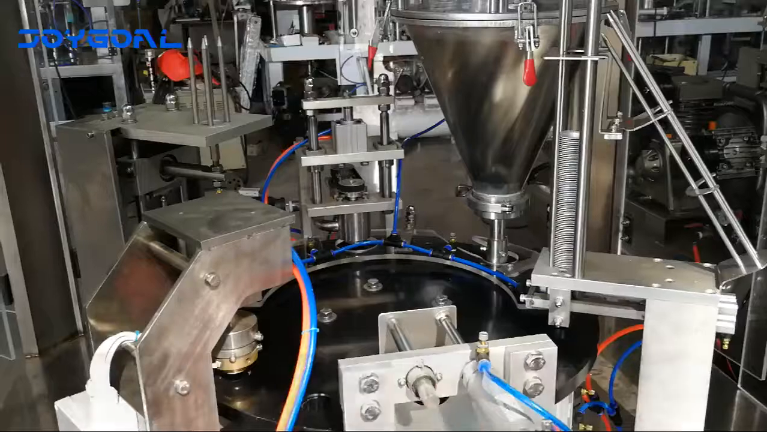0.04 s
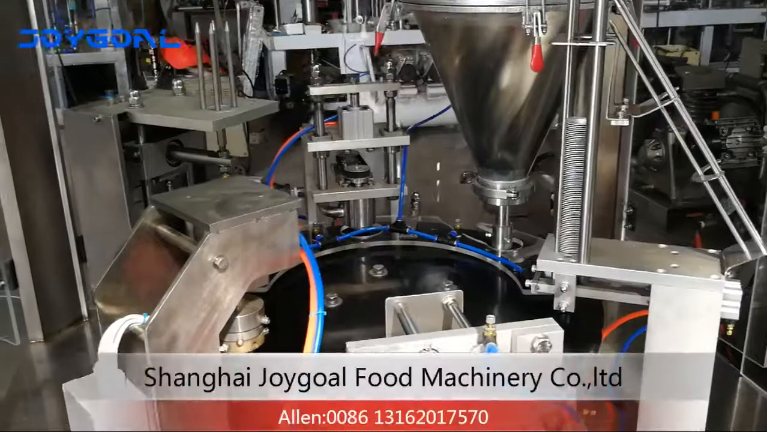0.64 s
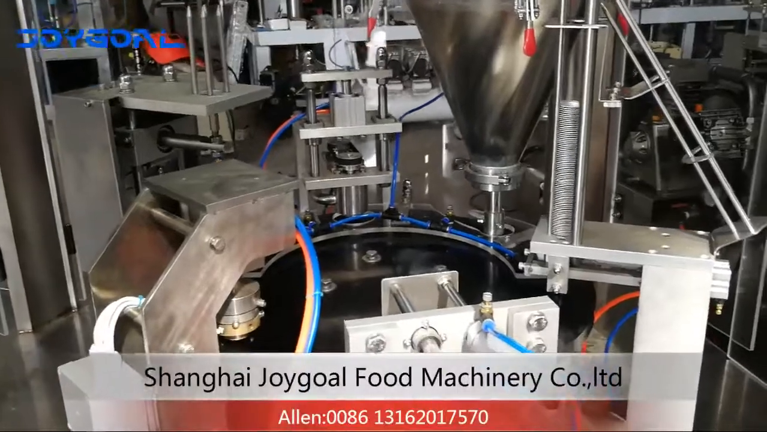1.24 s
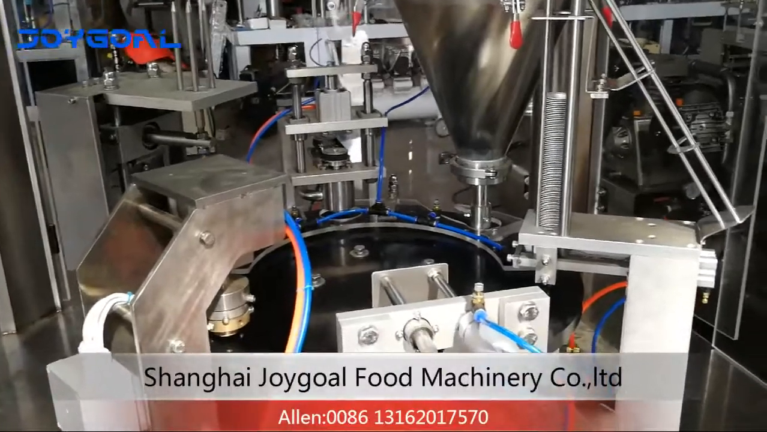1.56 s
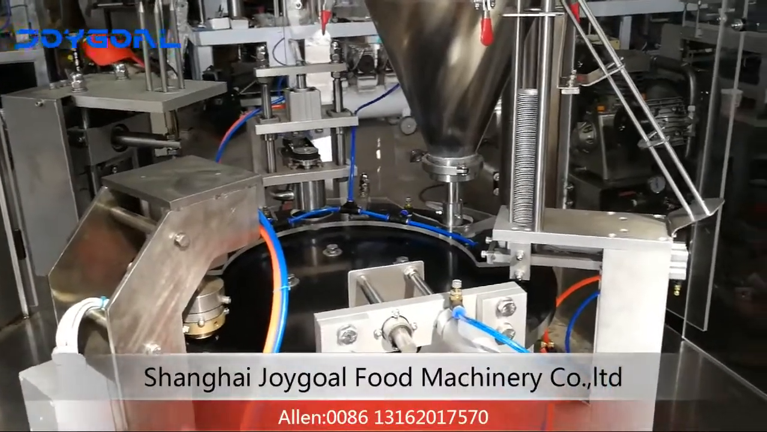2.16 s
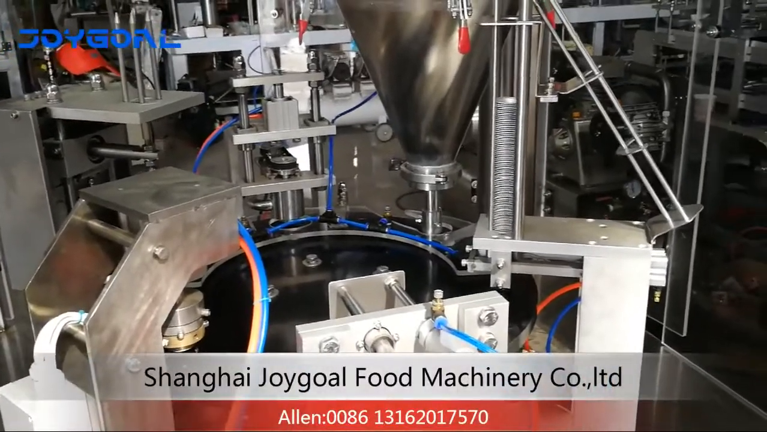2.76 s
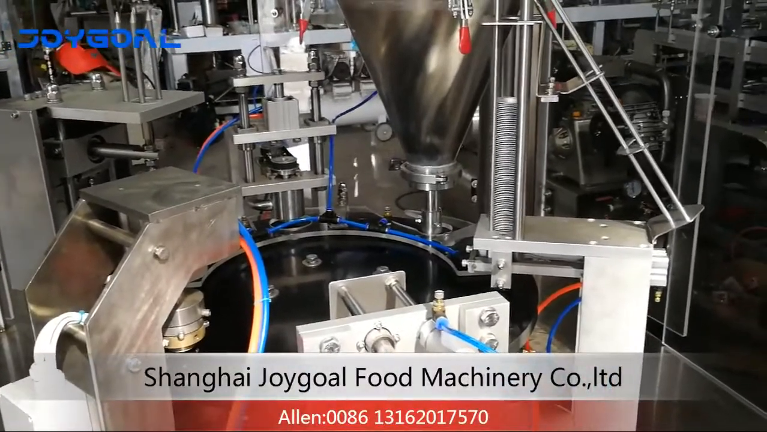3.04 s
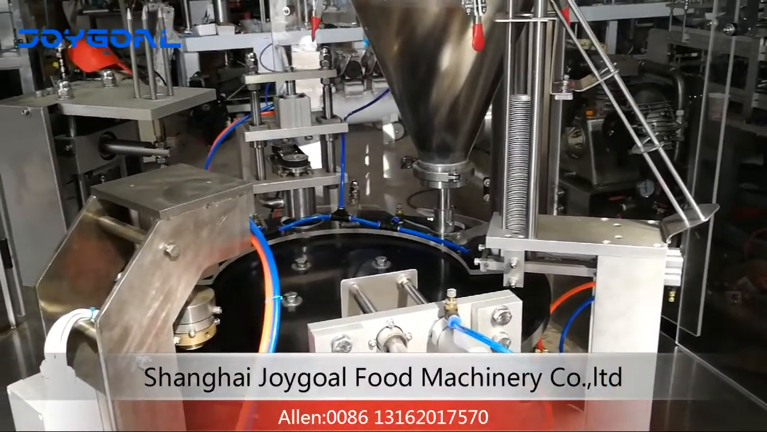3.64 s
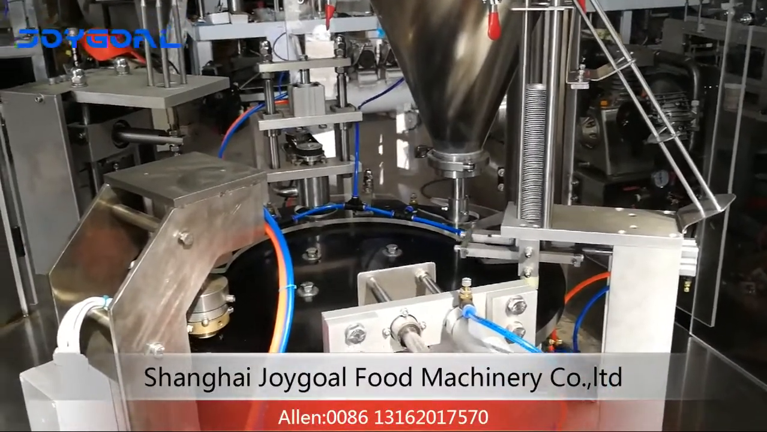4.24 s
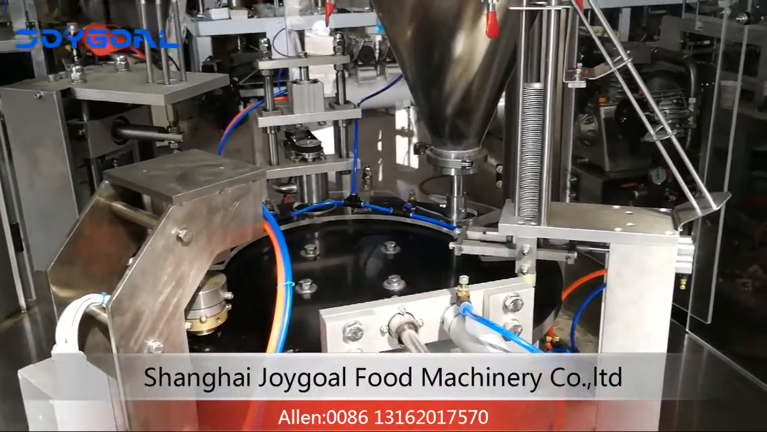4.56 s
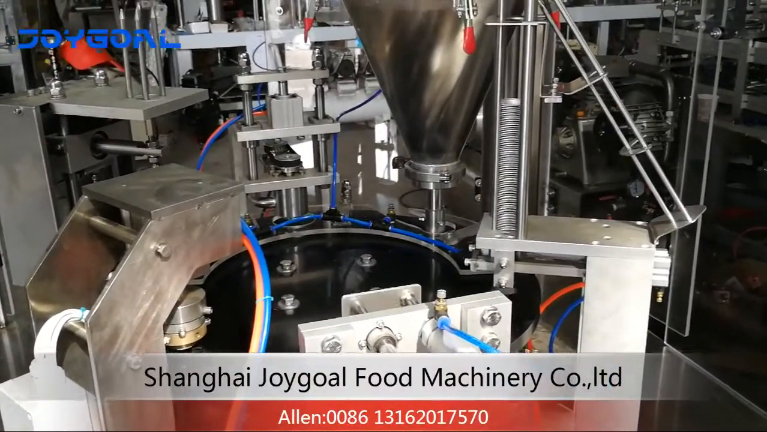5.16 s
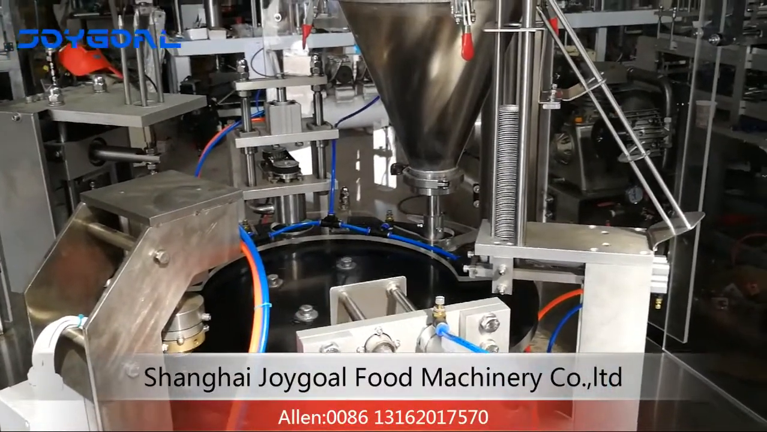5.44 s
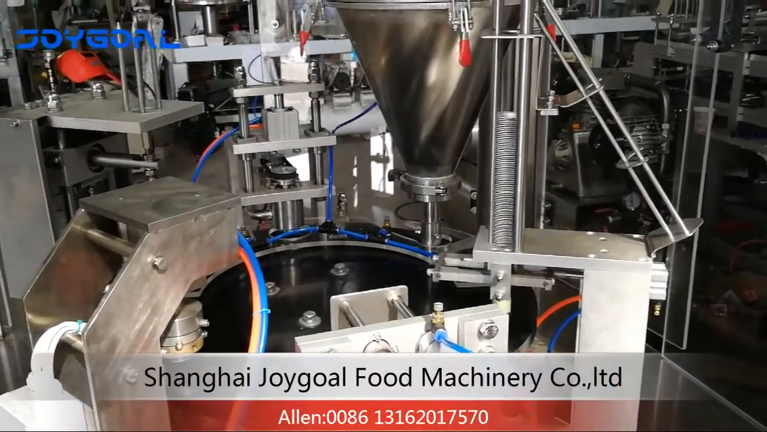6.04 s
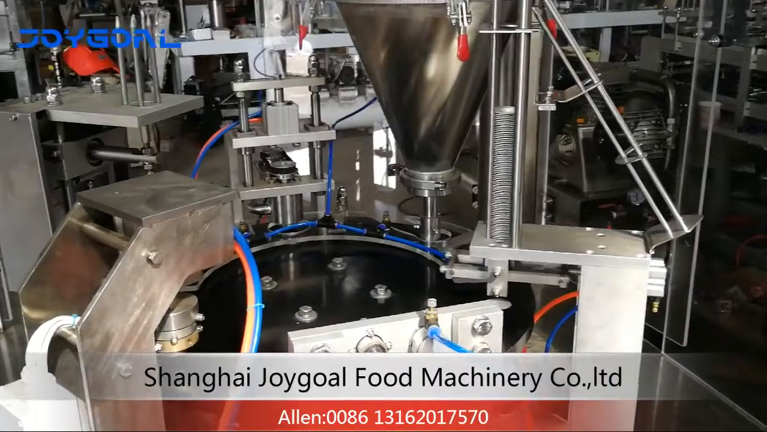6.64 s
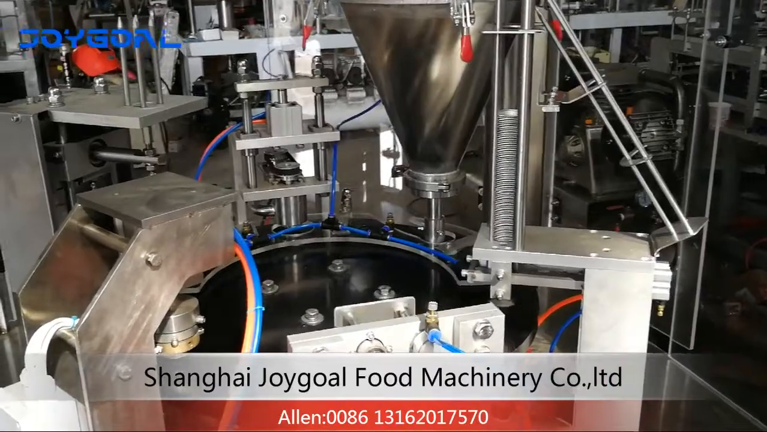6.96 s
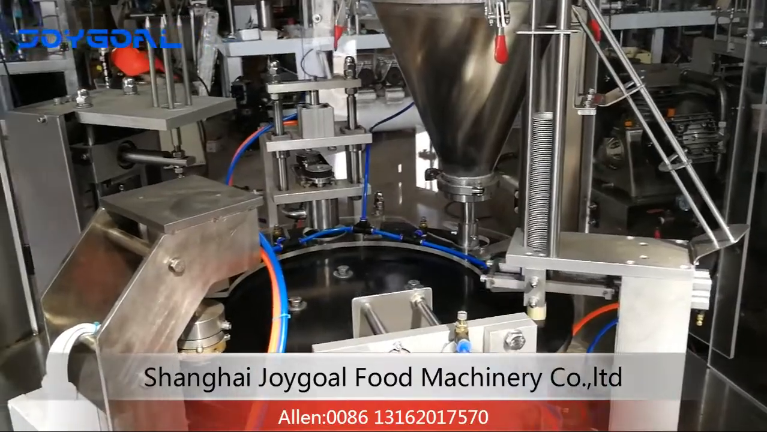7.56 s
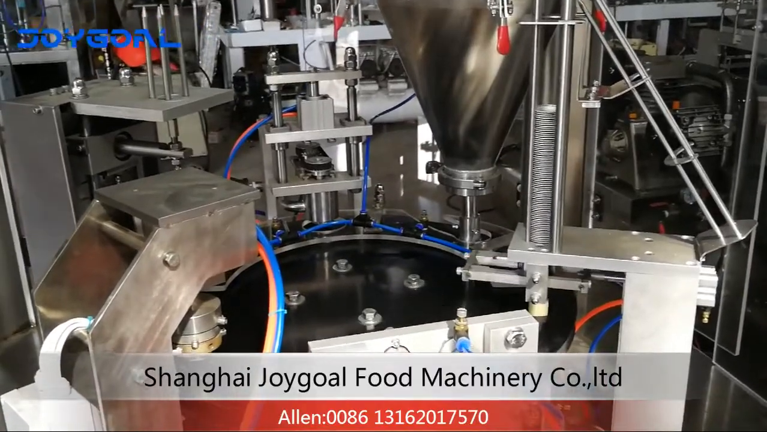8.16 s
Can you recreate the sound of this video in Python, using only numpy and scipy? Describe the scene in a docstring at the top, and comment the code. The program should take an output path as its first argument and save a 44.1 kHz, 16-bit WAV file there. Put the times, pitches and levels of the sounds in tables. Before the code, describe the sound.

Steady pump hum and throbbing whine with air leaks and thin whistles, joined midway by rhythmic air puffs, low thumps and light metallic clacks.

```python
"""A vacuum pump drones and whines close by: a rotary filling and sealing machine runs in a workshop.
The pump's tones follow its turning shaft, while compressed air hisses, leaks and whistles in the fittings.
From about 3.9 s the stations work: every 1.8 s four air valves puff in turn, each with a low thump,
cylinders knock against their metal stops, and loose parts rattle. The hard walls add a short echo."""
import sys
import numpy as np
from scipy import signal
from scipy.fft import rfft, irfft, next_fast_len
from scipy.io import wavfile

SR = 44100
rng = np.random.default_rng(int(sys.argv[2]) if len(sys.argv) > 2 else 0)


def generate_wav(signal):
    """Clip the signal to [-1, 1] and save it as 16-bit WAV at the path in sys.argv[1]."""
    frames = np.transpose(np.atleast_2d(signal))
    scaled = np.clip(frames, -1, 1) * 32767
    pcm = np.round(scaled).astype(np.int16)
    wavfile.write(sys.argv[1], SR, pcm)


N = 365588
TIME = np.arange(N) / SR
FIRST_CYCLE_S, CYCLE_S, CYCLE_COUNT = 3.893, 1.7985, 3
CYCLE_STARTS_S = FIRST_CYCLE_S + CYCLE_S * np.arange(CYCLE_COUNT)

# How fast the pump's shaft turns: time_s, turns_per_s
SHAFT_SPEED = [(0.5, 15.536), (8.3, 15.519)]
# Tones of the drone (left_db above 0 means louder on the left): waves_per_turn, level_db, left_db
DRONE_TONES = [(3, -62, 0), (4, -53, -1), (5, -49, -7), (6, -56.5, -1), (7, -62, 1), (8, -53, 0),
               (9, -45.5, 9.5), (10, -51.5, -15), (11, -38.7, 0), (15, -43, 1), (16, -51.5, 4),
               (18, -54, -16), (20, -45, 1.5), (23, -52, 11), (24, -47, -6.5), (30, -48, 6.5),
               (33, -47.5, -5), (40, -43.5, 5.5), (41, -59, 16), (46, -48, 9.5), (49, -47, 10),
               (52, -53, 24), (53, -55, 19.5), (56, -53, 19.5)]
# Weaker tones around the main whine: waves_per_turn, level_db, left_db
WHINE_TONES = [(74, -47, -6), (75, -41, 3), (76, -44, 10), (77, -40.5, 3), (81, -50, -3), (82, -47, 5)]
WHINE_WAVES_PER_TURN = 79
# The four valves of a cycle: offset_s, level_db, pitch_hz, width_hz, decay_s, thump_db
VALVE_PUFFS = [(0, -26.5, 7730, 1200, 0.031, -29), (.341, -30, 5300, 1450, .039, -54),
               (.746, -27.5, 7420, 1270, .037, -31.5), (1.144, -30.5, 4970, 1250, 0.032, -55)]
# How alike the two sides are in spread-out noise: pitch_hz, likeness (1 = the same)
SIDE_LIKENESS = [(90, .997), (200, .95), (400, .5), (700, 0), (1300, .15), (3000, 0)]
# Which side that noise favours: pitch_hz, left_db
SIDE_BALANCE = [(100, -1.5), (350, 7), (700, 2.5), (1300, 5.5), (2400, -0.5), (4400, -2.5), (8000, -2.5),
                (10500, 9), (13000, 19), (15500, 17.5)]


def amp(db):
    """Turns decibels into a gain to multiply by."""
    return 10 ** (np.asarray(db) / 20)


def unit(x):
    """Scales a signal to an average (rms) strength of 1."""
    return x / np.sqrt(np.mean(x ** 2) + 1e-20)


def follow(rows):
    """Joins (time_s, value) points into a curve over the whole scene."""
    return np.interp(TIME, *np.transpose(rows))


def at_hz(rows, hz):
    """Reads between (pitch_hz, value) points, spaced by octaves."""
    pitches, values = np.transpose(rows)
    return np.interp(np.log(hz + 1), np.log(pitches + 1), values)


def pan(left_db):
    """Two gains that make the left side left_db louder than the right."""
    return amp(np.array([left_db, -left_db]).reshape(2, -1) / 2)


def drift(rate_hz):
    """A random wander of strength 1 that changes course rate_hz times a second."""
    points = rng.standard_normal(4000)
    return unit(np.interp(TIME * rate_hz, np.arange(len(points)), points))


def noise(spectrum, diffuse=True):
    """Shaped noise, alike on both sides in the bass only; diffuse adds the side balance."""
    size = next_fast_len(N)
    hz = np.fft.rfftfreq(size, 1 / SR)
    left, other = rfft(rng.standard_normal((2, size)))
    likeness = np.clip(at_hz(SIDE_LIKENESS, hz), -1, 1)
    right = likeness * left + np.sqrt(1 - likeness ** 2) * other
    shaped = np.array([left, right]) * amp(at_hz(spectrum, hz))
    if diffuse:
        shaped = shaped * pan(at_hz(SIDE_BALANCE, hz))
    return unit(irfft(shaped, size)[:, :N])


def resonance(t, hz, width_hz):
    """A fuzzy tone: a narrow band of noise around hz, different on each side."""
    pole = np.exp(-1.3 * np.pi * abs(width_hz) / SR)
    white = rng.standard_normal((2, len(t))) + 1j * rng.standard_normal((2, len(t)))
    smooth = signal.sosfilt([[1 - pole, 0, 0, 1, -pole, 0]] * 3, white)
    tone = np.exp(2j * np.pi * np.cumsum(hz + 0 * t) / SR)
    return unit((smooth * tone).real)


def add(mix, start_s, sound):
    """Mixes a sound in at start_s."""
    part = mix[:, max(round(start_s * SR), 0):][:, :sound.shape[-1]]
    part += sound[..., :part.shape[1]]


def shaft_tones(rows, angle, waver, spread):
    """Tones locked to the shaft; the higher ones reach the two sides out of step."""
    out = np.zeros((2, N))
    shared_wander = drift(3.1)
    for multiple, db, left_db in rows:
        phase = round(multiple) * angle + 2 * np.pi * rng.random() + waver * shared_wander
        lag = np.array([[0], [spread * max(multiple - 6, 0)]])
        shade = min(multiple / 20, 1)  # long waves are about equally loud on both sides
        out += amp(db) * pan(left_db * shade) * (1 + waver * drift(6)) * np.cos(phase - lag)
    return unit(out)


def pump():
    """The pump drones, whines and churns; its rush flutters as the vanes pass and rings in the ducts."""
    # How loud the drone is through the scene: time_s, level_db
    drone_levels = [(0.53, -29.5), (1.22, -34.5), (4.8, -36), (5.32, -34), (6.4, -38), (7.48, -33.5),
                    (7.55, -38), (8.17, -33), (8.28, -36)]
    # Tone colour of the machinery's rush: pitch_hz, level_db
    rush_spectrum = [(25, -24), (60, -2.5), (150, -3.5), (330, -6.5), (580, -4.5), (900, -3), (1280, -6),
                     (1650, -6), (2000, -5), (2400, -4.5), (3600, -8), (7000, -16), (10000, -19),
                     (16000, -44)]
    # Ringing ducts and panels: pitch_hz, width_hz, level_db, left_db
    duct_rings = [(1224, 124, -43, -4.5), (1963, 204, -44, 1.5), (4060, 900, -41.5, -0.5),
                  (7790, 520, -45.5, -2), (8350, 1400, -46, 5)]
    angle = 2 * np.pi * np.cumsum(follow(SHAFT_SPEED)) / SR
    drone_db = follow(drone_levels)
    drone = amp(drone_db + 3) * shaft_tones(DRONE_TONES, angle, waver=0.055, spread=0.074)
    vane_flutter = 1 + 0.16 * np.cos(5 * angle)
    rush = amp(0.28) * noise(rush_spectrum) * vane_flutter + amp(-5) * churn(angle)
    ducts = sum(amp(db - 1) * pan(left_db) * resonance(TIME, hz, width_hz)
                for hz, width_hz, db, left_db in duct_rings)
    return drone + whine(angle) + amp(0.62 * drone_db - 12) * rush + ducts


def whine(angle, throb=0.26, sway=0.44, flutter=0.12, tight_spot_turns=0.42):
    """Meshing gear teeth sing; a tight spot makes the tone swell and sway once a turn."""
    # How loud the whine is through the scene: time_s, level_db
    whine_levels = [(0.53, -29), (2.36, -32.5), (3.64, -31), (3.96, -36), (4.61, -32.5), (4.65, -35.5),
                    (4.85, -31.5), (5.32, -34), (5.6, -31), (6.57, -36), (7.24, -32), (7.61, -38),
                    (8.21, -35.5), (8.28, -41)]
    turn = angle - 2 * np.pi * tight_spot_turns
    swell = 1 + throb * np.cos(turn) + flutter * np.array([drift(25), drift(25)])
    phase = WHINE_WAVES_PER_TURN * angle + sway * np.sin(turn) + flutter * drift(5.5)
    neighbours = amp(-10.5) * shaft_tones(WHINE_TONES, angle, waver=0.2, spread=0.01)
    return amp(follow(whine_levels) + 0.9) * (unit(swell * np.cos(phase)) + neighbours)


def churn(angle, size=4096):
    """Rough pumping repeats with every turn, making weak tones between the strong ones."""
    # Tone colour of the churn: pitch_hz, level_db
    spectrum = [(40, -20), (100, -13), (250, -3.5), (420, -7.5), (580, -17.5), (750, -7), (1000, -7.5),
                (1330, -2), (1600, -13), (2500, -20)]
    multiples = np.arange(size // 2 + 1)
    hz = multiples * SHAFT_SPEED[0][1]
    phase = 2 * np.pi * rng.random(len(hz))
    apart = np.arccos(np.clip(at_hz(SIDE_LIKENESS, hz), -1, 1)) * rng.standard_normal(len(hz))
    gains = amp(at_hz(spectrum, hz)) * pan(at_hz(SIDE_BALANCE, hz))
    tones = gains * np.exp(1j * np.array([phase, phase + apart]))
    strong = [round(row[0]) for row in [*DRONE_TONES, *WHINE_TONES]] + [WHINE_WAVES_PER_TURN]
    wanted = (hz < spectrum[-1][0]) * (multiples > 2) * ~np.isin(multiples, strong)
    one_turn = irfft(tones * wanted, size)
    place = angle / (2 * np.pi) * size % size
    return unit(np.array([np.interp(place, np.arange(size), side) for side in one_turn]))


def valve_flow(start_s, length_s, open_s, shut_s):
    """Flow through a valve that opens gradually and shuts again, from 0 to 1."""
    opening = (TIME - start_s) / open_s
    shutting = (start_s + length_s - TIME) / shut_s
    return np.clip(np.minimum(opening, shutting) + 0.5, 0, 1)


def air_feed(feed_s=1, ramp_s=0.06):
    """Air is fed during the first part of every cycle."""
    return sum(valve_flow(start_s + ramp_s / 2, feed_s - ramp_s, ramp_s, ramp_s)
               for start_s in CYCLE_STARTS_S)


def air_hiss(flutter_db=0.7, flutter_hz=30):
    """Compressed air hisses in the lines and at a near nozzle: a trickle, each cycle's feed, and gusts."""
    # Tone colour of the air lines: pitch_hz, level_db
    line_spectrum = [(1500, -21), (2600, -5), (3300, -1), (4900, 1), (6000, -1.5), (7300, -2), (8000, -5.5),
                     (9300, -8.5), (12000, -18), (16000, -30.5)]
    # Tone colour of the nozzle: pitch_hz, level_db
    nozzle_spectrum = [(5000, -15), (8000, -32), (10000, -5), (12000, -2.5), (13600, -4), (14600, -2.5),
                       (16000, -15)]
    # Gusts that do not repeat: start_s, length_s, line_db, nozzle_db
    gusts = [(0.393, 0.33, -43.5, -52), (1.113, 0.96, -43.5, -55), (1.325, 0.097, -42, -47),
             (2.1, 0.38, -38.5, -44), (2.44, 0.84, -42.5, -54), (2.726, 0.3, -43, -49),
             (2.88, 0.19, -40, -42.5), (4.25, 0.41, -42.5, -42), (6.145, 0.47, -41.5, -45),
             (7.146, 0.8, -44.5, -51)]
    feed = air_feed()
    line_power = amp(-47) ** 2 + (amp(-45.5) * feed) ** 2  # steady trickle plus feed
    nozzle_power = amp(-58.5) ** 2 + (amp(-48) * feed) ** 2
    for start_s, length_s, line_db, nozzle_db in gusts:
        flow = valve_flow(start_s, length_s, open_s=0.32, shut_s=0.27)
        line_power += (amp(line_db) * flow) ** 2
        nozzle_power += (amp(nozzle_db) * flow) ** 2
    lines = np.sqrt(line_power) * amp(10.5 + flutter_db * drift(flutter_hz)) * noise(line_spectrum)
    nozzle = np.sqrt(nozzle_power) * amp(10 + flutter_db * drift(flutter_hz)) * noise(nozzle_spectrum)
    return lines + nozzle


def leaks():
    """Brief gliding hisses as seals open and close; the highest come from the nozzle on the left."""
    # Escapes of air: peak_s, swell_s, pitch_hz, glide_octaves_per_s, width_hz, level_db
    escapes = [(0.531, 0.17, 7900, 0.063, 2600, -35), (0.95, 0.11, 12750, 0, 750, -34.5),
               (1.03, .08, 6800, -0.093, 900, -37), (1.191, .05, 2875, 0, 500, -34),
               (1.65, .2, 3880, -0.41, 1300, -36), (2.4, .18, 4980, -0.16, 600, -35.5),
               (3.0, .085, 4930, 0, 2200, -31.5), (3.5, .06, 4420, -1, 1200, -34.5),
               (3.51, .06, 12400, -1.1, 2100, -33), (4.151, .075, 4630, -0.013, 350, -36),
               (4.86, .11, 3180, 0.072, 800, -35.5), (4.871, 0.074, 5310, 0.18, 60, -39),
               (6.25, .08, 11940, 0.28, 2600, -38), (6.6, .38, 4224, -.1, 1210, -28),
               (6.8, 0.15, 11800, -0.19, 2200, -40)]
    out = np.zeros((2, N))
    for peak_s, swell_s, hz, glide, width_hz, db in escapes:
        fade_s = 1.25 * swell_s
        t = np.arange(-2 * swell_s, 2 * fade_s, 1 / SR)
        shape = np.exp(-(t / np.where(t < 0, swell_s, fade_s)) ** 2)
        hiss = resonance(t, hz * 2 ** (glide * t), width_hz)
        add(out, peak_s + t[0], amp(db + 2.5) * pan(0.61 * at_hz(SIDE_BALANCE, hz)) * shape * hiss)
    return out


def whistles():
    """Air squeezed through throttles sings with a breathy edge; pressure builds, holds and drains."""
    # Whistle notes: start_s, rise_s, hold_s, decay_s, pitch_hz, width_hz, level_db, breath_db
    notes = [(0.719, 0.077, 0.031, 0.29, 4170, 200, -33.5, -12),
             (3.566, 0.16, .1, 0.19, 4045, 126, -25, -36),
             (6.031, 0.27, 0.16, 0.11, 4224, 384, -29.5, -0.5),
             (6.605, 0.21, 0.49, 0.31, 4136, 380, -39, 1.5), (7.626, 0.061, 0.18, .05, 4050, 450, -37, -2)]
    out, t = np.zeros((2, N)), np.arange(2 * SR) / SR
    for start_s, rise_s, hold_s, decay_s, hz, width_hz, db, breath_db in notes:
        pressure = np.minimum(t / rise_s, 1) * np.exp(-np.maximum(t - rise_s - hold_s, 0) / decay_s)
        tone = resonance(t, hz, width_hz) + amp(breath_db) * resonance(t, hz, width_hz=800)
        add(out, start_s, amp(db + 4.5) * pressure * tone)
    return out * pan(left_db=-1.5)


def knocks():
    """Cylinders and cams hit metal stops, which ring briefly over the clack of the frame."""
    # Knocks of every cycle: offset_s, level_db, pitch_hz, width_hz, decay_s, left_db
    cycle_knocks = [(.111, -33, 895, 650, 0.021, 7), (.313, -28, 1663, 1240, 0.031, 6),
                    (.368, -27, 2130, 750, 0.0094, 8), (.798, -32.5, 1470, 300, .025, 4),
                    (1.551, -24.5, 1482, 220, 0.012, 11.5)]
    # Knocks that do not repeat: start_s, level_db, pitch_hz, width_hz, decay_s, left_db
    stray_knocks = [(1.138, -26.5, 1390, 300, 0.046, 0), (5.155, -35, 937, 400, 0.052, 7),
                    (5.504, -34, 1424, 200, .03, 3), (7.545, -19, 5400, 800, 0.0051, 14),
                    (7.552, -30.5, 1086, 200, 0.024, 8)]
    # Tone colour of the struck frame: pitch_hz, level_db
    frame_spectrum = [(200, -26), (700, 2), (1500, -1), (3000, 14), (6000, -36), (16000, -24)]
    out, t = np.zeros((2, N)), np.arange(SR // 4) / SR
    frame = noise(frame_spectrum, diffuse=False)
    regular = [(start_s + offset_s, *knock)
               for start_s in CYCLE_STARTS_S for offset_s, *knock in cycle_knocks]
    for start_s, db, hz, width_hz, decay_s, left_db in regular + stray_knocks:
        ring = amp(2) * resonance(t, hz, width_hz)
        clack = amp(-7) * np.roll(frame, rng.integers(N), 1)[:, :len(t)]
        shape = (1 - np.exp(-t / 0.0002)) * np.exp(-t / decay_s)
        add(out, start_s, amp(db) * pan(left_db) * (ring + clack) * shape)
    return out


def valves(open_s=0.0058):
    """Each valve dumps its air: its port rings and sprays. The feed bleeds out through a silencer."""
    # Tone colour of a puff's spray: pitch_hz, level_db
    spray_spectrum = [(1000, -38), (3000, 2), (5000, 7), (8000, 6.5), (10500, 4), (14000, 3), (16000, -3)]
    # Hiss bands of the exhaust silencer: pitch_hz, width_hz, level_db
    silencer_bands = [(6890, 890, -7), (7110, 4500, 0), (9030, 720, -8)]
    out, t = np.zeros((2, N)), np.arange(SR // 2) / SR
    spray = noise(spray_spectrum, diffuse=False)
    for start_s in CYCLE_STARTS_S:
        for offset_s, db, hz, width_hz, decay_s, _ in VALVE_PUFFS:
            port = resonance(t, hz, width_hz)
            jet = port + amp(-1) * np.roll(spray, rng.integers(N), 1)[:, :len(t)]
            pressure = (1 - np.exp(-(t / open_s) ** 2)) * np.exp(-t / decay_s)
            add(out, start_s + offset_s - 0.003, amp(db + 3) * pressure * jet)
    bleed = sum(amp(db) * resonance(TIME, hz, width_hz) for hz, width_hz, db in silencer_bands)
    return pan(left_db=17.5) * (out + amp(-41) * air_feed() * bleed)


def thumps(pitch_hz=74):
    """The push of each puff reaches both sides as one low thump."""
    # How hard each cycle thumps: force_db
    cycle_forces = [-1.8, -1, 3]
    out, t = np.zeros((2, N)), np.arange(SR // 8) / SR
    thump = -np.sin(2 * np.pi * pitch_hz * t) * (t / 0.0058) * np.exp(1 - t / 0.0063)
    for start_s, force_db in zip(CYCLE_STARTS_S, cycle_forces):
        for offset_s, *_, thump_db in VALVE_PUFFS:
            add(out, start_s + offset_s - 0.01, amp(thump_db + force_db) * thump)
    return out


def rattle(taps_per_s=7, middle_hz=1007, decay_s=0.018):
    """Once the stations move, loose parts tap lightly at uneven moments, each on its own pitch."""
    out, t = np.zeros((2, N)), np.arange(SR // 6) / SR
    for tap, (jitter, detune, force) in enumerate(rng.uniform(-1, 1, size=(40, 3))):
        start_s = FIRST_CYCLE_S + (tap + 1 + jitter) / taps_per_s
        ring = resonance(t, middle_hz * (1 + 0.18 * detune), width_hz=120)
        add(out, start_s, amp(-35 + 4 * force) * ring * np.exp(-t / decay_s))
    return out * pan(left_db=11.5)


def workshop_echo(sound, fade_s=0.35):
    """The hard walls return a blurred echo that falls 60 dB in fade_s."""
    t = np.arange(SR // 2) / SR
    tail = rng.standard_normal((2, len(t))) * amp(-60 * t / fade_s) * (t > 0.006)
    tail /= np.linalg.norm(tail[0])
    return signal.fftconvolve(sound, tail, axes=1)[:, :N]


def scene():
    """The running pump, the air, and the strokes of the stations with their echo."""
    strokes = valves() + knocks() + rattle()
    running = pump() + air_hiss() + whistles() + leaks()
    return running + thumps() + strokes + amp(-10) * workshop_echo(strokes)


def record(dry, start_s=0.509, top_hz=15900):
    """The sound switches on abruptly at start_s, and the treble above top_hz is cut."""
    switch_on = np.clip((TIME - start_s) * 1000, 0, 1)
    low_pass = signal.firwin(511, top_hz, window=("kaiser", 9), fs=SR)
    return signal.oaconvolve(dry * switch_on, low_pass[None], "same")


dry = scene()
out = record(dry)
generate_wav(out)
```